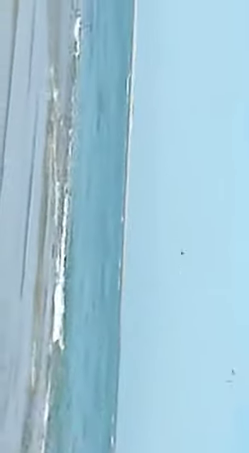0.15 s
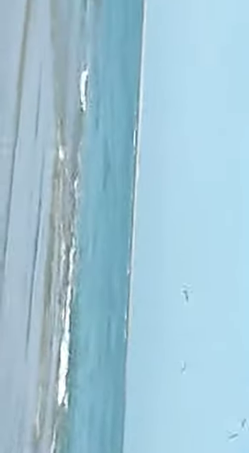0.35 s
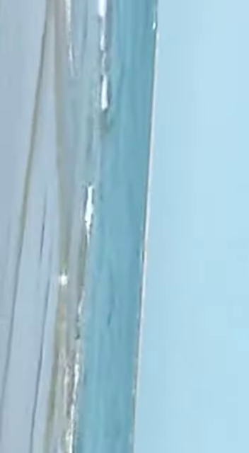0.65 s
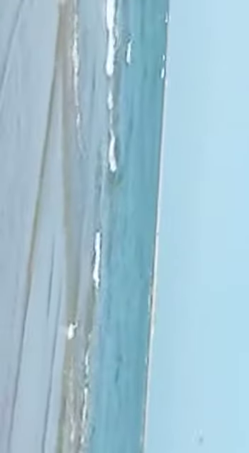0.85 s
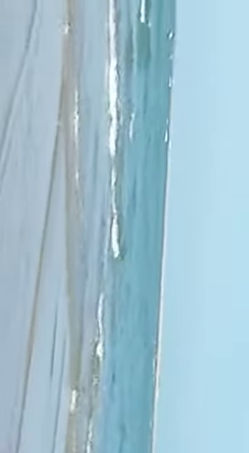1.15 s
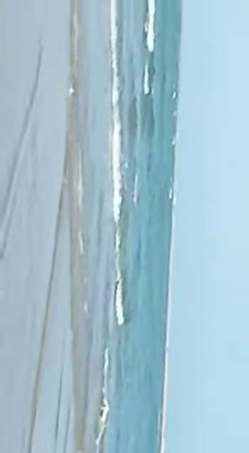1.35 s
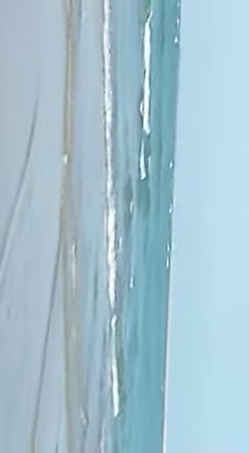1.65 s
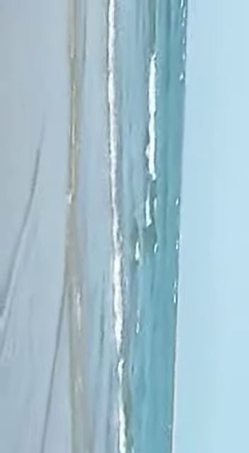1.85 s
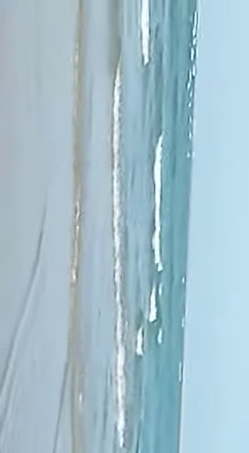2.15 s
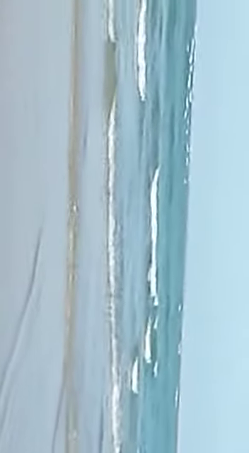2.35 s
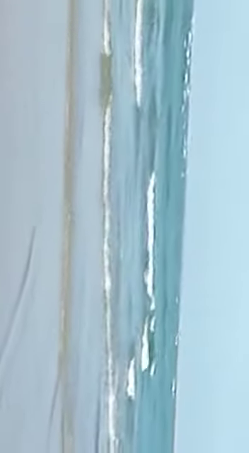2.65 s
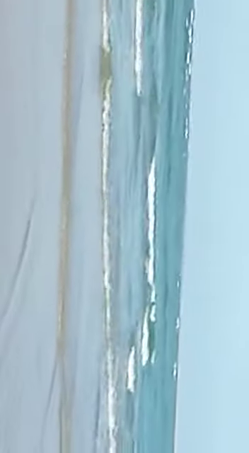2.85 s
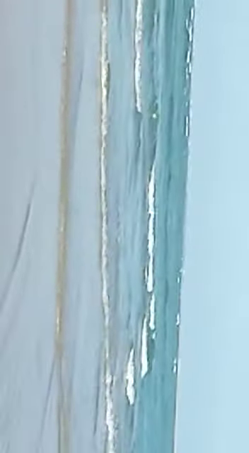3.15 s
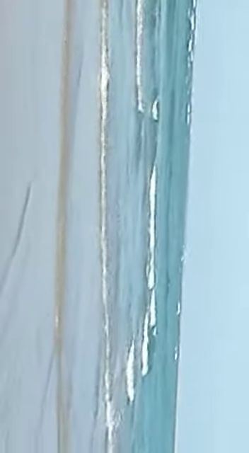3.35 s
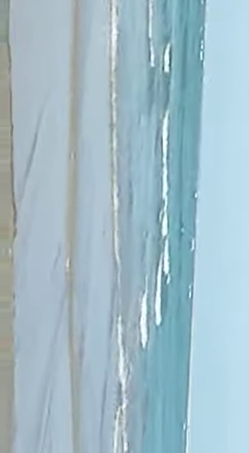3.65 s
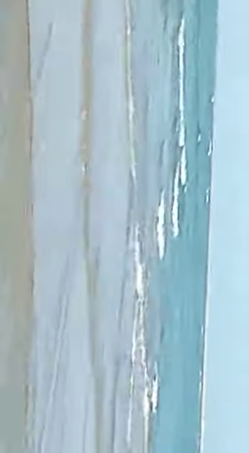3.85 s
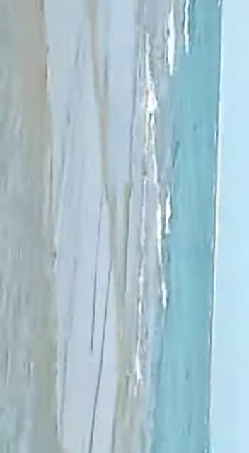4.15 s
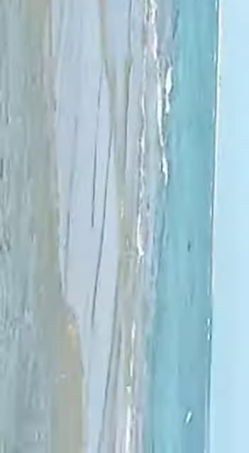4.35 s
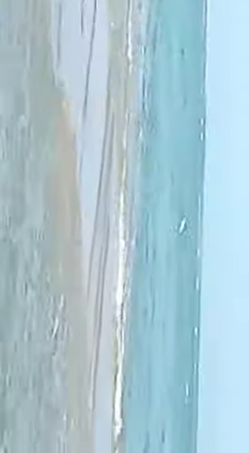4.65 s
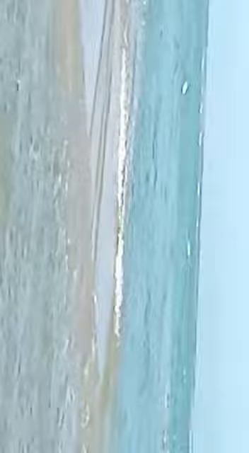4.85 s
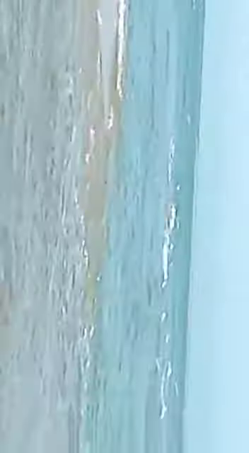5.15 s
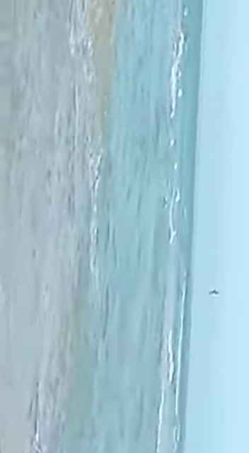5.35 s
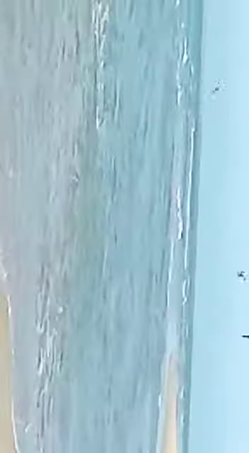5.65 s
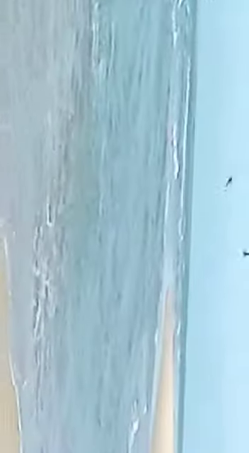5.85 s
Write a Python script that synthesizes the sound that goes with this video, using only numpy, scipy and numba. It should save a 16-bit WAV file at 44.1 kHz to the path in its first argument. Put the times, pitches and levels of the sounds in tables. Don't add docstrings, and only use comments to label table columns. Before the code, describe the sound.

A big flock of terns screams in harsh overlapping trills over a windy beach, heavy gusts thumping the phone microphone above faint surf hiss.

```python
import sys
import numpy as np
from scipy import signal
from scipy.fft import rfft, irfft
from scipy.io import wavfile
from scipy.ndimage import uniform_filter1d, map_coordinates
from numba import njit

SR = 44100
rng = np.random.default_rng(int(sys.argv[2]) if len(sys.argv) > 2 else 0)


def master(y):
    cut = np.clip(np.atleast_2d(y).T, -1, 1)
    pcm = np.round(cut * 32767)
    wavfile.write(sys.argv[1], SR, pcm.astype(np.int16))


def volts_from_decibels(level):
    exponent = np.asarray(level, float) / 20
    return 10 ** exponent


N = 265041
T = np.arange(N) / SR

# (time [s], level [dB], brightness [dB])
FLOCK_LEVELS = [(0.0, -19.5, -27.5), (0.099, -25.5, -28), (0.4, -19.5, -26), (0.65, -16.5, -29.5),
                (1.17, -19.5, -32.5), (1.29, -23, -30.5), (1.841, -23, -31), (1.918, -34.5, -28.5),
                (2.39, -30.5, -28), (2.88, -26.5, -30), (3.06, -38, -29.5), (3.75, -27, -31),
                (4.05, -34.5, -31.5), (4.27, -29.5, -26), (4.7, -20.5, -31), (4.95, -25, -31.5),
                (5.3, -24, -36.5), (6.01, -23.5, -38)]
OVERTONES_DB = [-15.5, -7.5, -2, -3.5, -5, -8, -11.5, -11, -17.5, -11, -13, -7.5, -13.5]
# (time [s], level [dB])
SURF_LEVELS = [(0, -27.5), (1.1, -21.5), (1.3, -25), (1.84, -23.5), (1.92, -30.5), (2.4, -27.5),
               (3.06, -33), (3.75, -30.5), (4.27, -32), (4.45, -28), (4.7, -30.5), (5.1, -29),
               (6.01, -28.5)]
# (frequency [Hz], level per Hz [dB])
SURF_TONE = [(400, -3), (800, -2.5), (1300, -3.5), (1900, 4), (3000, 5), (4500, -6), (6000, -5.5),
             (15500, -14.5)]
# (time [s], level [dB], turbulence [dB])
GUSTS = [(0.0, -19.5, -15.5), (0.38, -25.5, -11.5), (0.55, -17.5, -21.5), (1.07, -15.5, -8.5),
         (1.59, -10, -13), (1.67, -19.5, -9), (1.75, -11, -13), (2.96, -12, -13.5), (3.11, -18.5, -8.5),
         (3.17, -14.5, -10.5), (3.74, -14.5, -11.5), (3.85, -23, -11.5), (4.35, -22, -17),
         (4.44, -12, -10.5), (4.67, -19.5, -12), (5.2, -15, -7), (5.37, -19.5, -10), (6.01, -19.5, -9.5)]
# (frequency [Hz], level per Hz [dB])
WIND_TONE = [(15, -66.5), (25, -38.5), (74, -4), (111, 0), (143, -1), (300, -6), (501, -15), (743, -25),
             (961, -32), (1500, -39), (1950, -52), (3300, -120)]
# (time [s], length [s], level [dB])
HISSES = [(1.115, .015, -18), (1.151, .015, -14.5), (1.192, .05, -12), (1.258, .052, -17), (1.32, .02, -22),
          (0.351, .05, -16), (.57, .05, -15), (1.488, .05, -19.5), (1.81, .05, -18), (2.84, .085, -22.5),
          (3.41, .04, -24), (4.26, .08, -21), (4.66, .04, -18), (.79, .04, -16.5), (1.03, .06, -16.5),
          (.15, .025, -19), (2.44, .075, -25.5), (2.76, .05, -27), (4.5, .04, -21), (4.76, .085, -19.5),
          (5.875, 0, -25), (3.2, .04, -28), (5.48, .025, -27)]
# (time [s], peak [dB], centre [Hz], edge [dB])
THUMPS = [(0.204, -4.5, 194, -29), (0.623, -7, 135.4, -10), (1.003, -6, 200, -29), (1.171, -2, 346, -26),
          (1.299, -1, 201, -18), (1.327, -4, 243, -30), (1.626, -6.5, 279, -17), (1.883, -1.5, 205, -24),
          (1.921, -10, 312, -29), (1.95, -3, 132, -26), (3.158, 0.5, 170, -23), (2.11, 4.5, 130.4, -18),
          (2.749, -5, 148.5, -6), (2.8, 1, 125, -13), (2.937, 0, 285, -36), (3.435, 0, 175, -20),
          (3.613, -9, 157, -27), (3.753, -3, 136.7, -10.5), (3.885, -11, 224, -21), (4.396, -7.5, 276, -20),
          (2.28, -2, 213, -17), (4.803, -0.5, 249, -20), (4.893, -3, 225, -23), (5.064, -2.5, 317, -24),
          (5.206, -5, 138, -14), (5.493, -3.5, 124.3, -9.5), (3.712, -4, 125, -20), (5.704, -3, 169, -10.5),
          (5.89, -6.5, 257, -18), (5.972, -5, 153.6, -13), (.384, -25, 139, -22), (.418, -11, 99, -11),
          (0.879, -20, 115, -16), (1.093, 0.5, 210, -28), (1.387, -3.5, 144, -23), (1.732, -8, 153, -19),
          (3.376, -8, 165.5, -13.5), (3.558, -2.5, 211, -27), (3.986, -8.5, 170, -31),
          (4.045, -14, 216, -16), (4.322, -11, 132, -7.5), (4.422, -15, 131, -7), (4.483, -7.5, 194, -11),
          (4.52, -2, 169, -13), (5.553, -7, 128, -20), (5.255, -7, 187.5, -6), (5.838, -6.5, 191, -21),
          (5.603, -8, 200, -12), (5.935, -4.5, 150, -12), (4.712, -5.5, 186, -18), (5.997, -0.5, 165, -13),
          (1.699, -15, 147, -23), (2.2, -0.5, 200, -19)]
# (middle [s], pitch [Hz], slide over the cry [fraction], level [dB], second overtone [dB])
SCREAMS = [(.255, 1162, -0.0041, -26.5, 1), (.395, 1052, 0, -27.5, 1), (.443, 1145, -.05, -27.5, 5),
           (.571, 1230, .11, -26.5, -10), (.674, 1084, .1, -29.5, -1), (.722, 1132, 0.054, -34, 11),
           (.798, 1073, -0.089, -34, 16), (0.811, 1334, -.1, -24.5, -1), (.902, 1198, 0.0064, -26, 7),
           (1.078, 1023, 0.00036, -28.5, 1), (1.141, 1173, .1, -26, 3), (1.495, 1050, 0.099, -29, -10),
           (1.525, 1112, .1, -30, 5), (1.572, 1155, -0.086, -31.5, 7.5), (1.644, 1108, -0.0041, -29.5, 6),
           (1.8, 1085, -.05, -37.5, -3), (2.23, 1040, .07, -45, 6), (2.36, 1180, .03, -37, -2),
           (2.44, 1110, 0.131, -37, 7), (2.51, 1146, -.1, -39, 16), (2.666, 1250, 0.034, -37, 2),
           (2.92, 1215, -.12, -40.5, -8), (2.88, 1105, -0.08, -38, 13), (3.217, 1144, -0.092, -46, 9),
           (3.704, 1163, -0.059, -47.5, 8), (3.755, 1107, -0.12, -35.5, 2),
           (4.096, 1020, -.05, -40.5, 15.5), (4.171, 1233, -.06, -49.5, 17), (4.39, 900, 0.097, -52, 18),
           (4.435, 1090, 0.09, -30.5, -4), (4.466, 1105, -.05, -33.5, 7), (4.514, 1039, -.1, -30, 2),
           (4.657, 1115, -.05, -31, 3), (4.897, 1120, -.1, -30, -6), (4.981, 1090, -.1, -34, 9),
           (5.464, 1107, .05, -31, 0), (5.59, 1148, -.03, -32, -6), (5.659, 1120, -0.00067, -31, 2),
           (5.83, 1030, .05, -44, 12), (5.89, 1135, -0.0014, -34, -8)]
# (time [s], length [s], pitch [Hz], level [dB], brightness [dB])
RATTLES = [(0.281, 0, 1168, -20.5, -42), (0.491, 0.0023, 1225, -30.5, -34),
           (0.643, 0.0006, 1025, -25.5, -34), (0.74, .1, 1144, -24, -36.5),
           (1.037, 0.079, 1114, -23.5, -41.5), (1.19, 0.033, 1125, -23, -31.5),
           (2.079, 0.0029, 1153, -23, -34), (2.626, 0, 989, -30, -33.5), (3.018, 0, 1264, -23.5, -29),
           (3.048, .092, 1246, -31, -26.5), (3.187, 0.11, 1145, -30.5, -29.5),
           (3.615, .03, 1168, -24, -36.5), (4.077, 0.0086, 1172, -21, -44), (4.192, 0, 1204, -21, -39.5),
           (4.341, .021, 1161, -22.5, -38.5), (4.394, 0.002, 1132, -20.5, -34),
           (4.631, 0.011, 1048, -23, -33), (4.724, 0.007, 1087, -32, -28), (4.871, 0.0072, 1174, -19, -34),
           (4.92, 0.1, 1338, -31.5, -24), (5.042, 0, 1187, -24, -36.5), (5.11, 0, 1160, -19.5, -43),
           (5.211, 0.022, 1165, -19.5, -43), (5.454, .028, 1107, -20.5, -45.5)]
# (time [s], length [s], pitch [Hz], level [dB], brightness [dB])
TRILLS = [(0.32, 0.049, 1140, -19, -37), (0.565, 0.036, 1234, -16, -31), (1.129, 0.025, 1156, -24.5, -36),
          (1.5, 0.09, 1184, -23, -33), (1.669, 0.058, 1162, -20.5, -36.5), (1.807, 0.059, 1146, -32, -26.5),
          (2.352, .017, 1174, -25.5, -29.5), (2.43, .12, 1171, -32.5, -28.5),
          (2.3, .045, 1173, -30.5, -35.5), (2.76, 0.13, 1143, -31, -27.5), (3.463, 0.042, 1175, -29.5, -28),
          (3.746, 0.11, 1134, -33, -33), (4.434, 0.0094, 1096, -28.5, -43),
          (4.558, 0.034, 1113, -24, -31.5), (4.658, 0.031, 1092, -25.5, -30),
          (5.245, 0.016, 1173, -19, -46), (5.382, 0.024, 1220, -23, -37),
          (5.556, 0.043, 1128, -23.5, -42.5), (5.891, 0.044, 1138, -28, -39.5)]
# (time [s], length [s], pitch [Hz], level [dB], brightness [dB])
ANSWERS = [(1.2, 0.027, 1248, -30.5, -29), (2.62, .06, 1030, -33, -38), (1.8, 0.054, 1230, -33, -36),
           (3.2, 0.041, 1060, -32, -33), (3.018, .065, 1055, -31.5, -36), (3.17, 0.034, 1116, -35, -38),
           (3.905, .045, 1095, -35.5, -38), (4.205, .02, 1187, -31.5, -38), (.58, 0.047, 1300, -19.5, -37),
           (.81, 0.037, 1345, -26, -36), (4.69, .02, 1500, -23, -36), (5.17, 0.045, 1000, -25.5, -40),
           (1.99, .06, 1170, -29, -41), (2.16, 0.078, 700, -36, -38), (4, .04, 1030, -33, -38),
           (2.9, 0.055, 1130, -32, -38), (5.3, 0.016, 1000, -24, -44), (5.405, 0.02, 1400, -25.5, -42),
           (5.965, 0.021, 1120, -24, -42), (1.7, 0.024, 1195, -28, -35), (0.84, .07, 1010, -24, -36),
           (2.53, .04, 1225, -32, -38), (3.5, .04, 1030, -33, -38), (5.79, 0.034, 1400, -35, -42)]
# (time [s], length [s], pitch [Hz], level [dB], brightness [dB])
CHURRS = [
    (3.953, 0, 1046, -32.5, -38),
    (4.0, 0.041, 1066, -32, -41),
    (4.066, 0.02, 1047, -35.5, -42),
    (4.105, 0.02, 1277, -27.5, -34),
    (4.145, 0.04, 1257, -28, -37),
    (4.3, 0.011, 1204, -37.5, -38),
    (4.845, .1, 1130, -41, -36),
    (2.19, .07, 1052, -34, -37),
]
# (time [s], peak [dB])
SLAPS = [(4.398, -12), (4.456, -14), (4.541, -10.5), (4.616, -15), (4.762, -16), (4.805, -14),
         (4.905, -13.5), (5.031, -13), (5.066, -15), (5.102, -12), (5.175, -8), (5.214, -9), (5.346, -22),
         (5.443, -18), (5.493, -11), (5.565, -17), (5.673, -16.5), (5.897, -19), (5.949, -17), (5.972, -9),
         (1.24, -19), (1.505, -24), (1.577, -17), (1.752, -26), (1.998, -19), (2.03, -20), (2.069, -16),
         (2.2, -20), (2.362, -16), (2.385, -13), (2.56, -32), (2.865, -27), (2.996, -17), (3.243, -23),
         (3.582, -22), (4.495, -21), (4.787, -31), (5.014, -15), (5.583, -17), (5.755, -17)]
# (frequency [Hz],
# level [dB])
MICROPHONE_TONE = [(2400, -0.5), (2650, -4.5), (2900, 3), (4300, 0.5), (4700, -11.5), (5100, -19.5),
                   (5600, -30), (6100, -25.5), (7300, -27.5), (8500, -34), (10000, -38), (11500, -37),
                   (13000, -49.5), (15500, -57.5)]


def level(x):
    return x / np.sqrt(np.mean(x ** 2))


def gain_at(table, hz):
    f, db = np.transpose(table)
    return np.interp(np.log(hz), np.log(f), db)


def colour(x, table, size=8192):
    hz = np.maximum(np.arange(size // 2 + 1) * SR / size, 1)
    cepstrum = irfft(np.log(volts_from_decibels(gain_at(table, hz))))
    cepstrum[1:size // 2] *= 2
    cepstrum[size // 2 + 1:] = 0
    ringing = irfft(np.exp(rfft(cepstrum)))
    return signal.fftconvolve(x, ringing)[:len(x)]


def split(x, hz):
    low = signal.sosfiltfilt(signal.butter(5, hz, fs=SR, output="sos"), x)
    return low, x - low


def smooth_twice(x, k):
    return uniform_filter1d(uniform_filter1d(x, k), k)


def walk(rate):
    k = int(SR / rate)
    steps = np.repeat(rng.standard_normal(N // k + 1), k)
    return level(smooth_twice(steps, k)[:N])


def steady(x, seconds):
    return x / np.sqrt(smooth_twice(x ** 2, int(seconds * SR)) + 1e-12)


def follow(table):
    s, *columns = np.transpose(table)
    return [np.interp(T, s, c) for c in columns]


def samples(s):
    return (s * SR).astype(np.int64)


@njit
def bursts(start, length, hz, glide, gains, turns):
    out = np.zeros(N)
    for e in range(len(start)):
        phase = 0.
        for i in range(length[e]):
            u = i / length[e]
            phase += 2 * np.pi * hz[e] * (1 + glide[e] * (u - .5)) / SR
            j = start[e] + i
            if j >= 0 and j < N:
                total = 0.
                for k in range(gains.shape[1]):
                    total += gains[e, k] * np.sin((k + 1) * phase + turns[e, k])
                out[j] += total * np.sin(np.pi * u) ** 2
    return out


def pips(s, hz, db, second_db, top_db, seconds, scatter_db, slide=0.024):
    count = len(OVERTONES_DB)
    order = np.arange(1, count + 1)
    chance = rng.standard_normal((len(s), 2 * count + 2))
    throat_db = OVERTONES_DB + np.outer(second_db, order == 2) + np.outer(top_db, order > 4)
    gains = volts_from_decibels(db[:, None] + throat_db + scatter_db * chance[:, :count])
    length = samples(seconds * np.exp(.15 * chance[:, -1]))
    glide = slide + .015 * chance[:, -2]
    return bursts(samples(s) - length // 2, length, 1. * hz, glide, gains, 10 * chance[:, count:-2])


def flock(pitch_hz=1195, count=400, size=16):
    bird = rng.standard_normal((count, 5, 1))
    onset = (np.arange(count) + 8 * rng.random(count)) * 6.5 / count - .45
    slip = rng.standard_normal((count, size, 3))
    along = np.linspace(-1, 1, size)
    gaps_s = .017 * np.exp(.3 * bird[:, 0] - .2 * along + .25 * slip[..., 0])
    s = onset[:, None] + np.cumsum(gaps_s, axis=1)
    hz = pitch_hz * np.exp(.06 * bird[:, 1] - .075 * (along + .3) ** 2 + .013 * slip[..., 1])
    db = 2.2 * bird[:, 2] + 2.5 * slip[..., 2] - 8 * along ** 4
    second_db = 1.5 * bird[:, 3] + 0 * s
    top_db = 1.5 * bird[:, 4] + 0 * s
    columns = (s, hz, db, second_db, top_db)
    return pips(*(c.ravel() for c in columns), seconds=0.014, scatter_db=0.5)


def surf():
    return level(colour(rng.standard_normal(N) * volts_from_decibels(2.0 * walk(20)), SURF_TONE))


def wind():
    happens = rng.random(N) < 900 / SR
    kicks = rng.standard_normal(N) * happens * volts_from_decibels(2.5 * np.minimum(rng.exponential(size=N), 3))
    flurries = volts_from_decibels(2.9 * walk(30) + 2.9 * walk(16))
    pressure = (level(kicks) + 0.75 * rng.standard_normal(N)) * flurries
    rumble, rasp = split(colour(pressure, WIND_TONE), hz=363.0)
    gust_db, rasp_db = follow(GUSTS)
    return volts_from_decibels(gust_db) * (steady(rumble, seconds=0.067) + volts_from_decibels(rasp_db) * steady(rasp, seconds=0.072))


def hisses(size=8, gap_s=.0125, puff_s=.008):
    s, seconds, db = np.transpose(HISSES)[..., None]
    gaps = np.round(seconds / gap_s)
    times = s + seconds * np.arange(size) / np.maximum(gaps, 1)
    sizes = volts_from_decibels(db + 1.5 * rng.standard_normal(times.shape)) * (np.arange(size) <= gaps)
    beats = np.bincount(samples(times).ravel(), sizes.ravel(), N)[:N]
    gate = signal.fftconvolve(beats, np.hanning(int(puff_s * SR)), "same")
    _, bright_air = split(rng.standard_normal(N), hz=5300)
    return gate * bright_air


def thumps(cycles=2.91):
    s, db, hz, edge_db = np.transpose(THUMPS)
    shape_db = [1.5, -7.0, 2.0, -7.0, -8.0]
    gains = volts_from_decibels(db[:, None] - 4.0 + shape_db + np.outer(edge_db, [0, 0, 1, 1, 1]))
    turns = 2 * np.pi * rng.random(gains.shape)
    return bursts(samples(s), samples(cycles / hz), hz, 0 * hz - .3, gains, turns)


def screams():
    s, hz, slide, db, second_db = np.transpose(SCREAMS)
    held = pips(s, hz, db, second_db, 0 * s - 7.0, seconds=0.11, scatter_db=1.5, slide=slide)
    return held * volts_from_decibels(6 * walk(110))


def near_birds(table, gap_s, second_db, sag=0.033, arch=.5, size=10):
    s, seconds, hz, db, top_db = np.array(table, float).T[..., None]
    slip = rng.standard_normal((len(table), size, 3))
    gaps = np.round(seconds / gap_s)
    along = np.arange(size) / np.maximum(gaps, 1)
    silent_db = -200 * (np.arange(size) > gaps)
    sagging = sag * (along - .5) * (gaps > 0)
    arching = arch * seconds * (2 * along - 1) ** 2
    pip_hz = hz * np.exp(-sagging - arching + 0.013 * slip[..., 0])
    pip_db = db + 0.33 * slip[..., 1] + silent_db
    throat_db = second_db - 30 * np.log(hz / 1160) + 2.0 * slip[..., 2]
    columns = (s + seconds * along, pip_hz, pip_db, throat_db, top_db + 34.0 + 0 * along)
    return pips(*(c.ravel() for c in columns), seconds=.014, scatter_db=1.3)


def slaps(hz=420, cycles=1.52):
    s, db = np.transpose(SLAPS)
    chance = rng.random((len(s), 2))
    pitch = hz * (0.81 + 0.32 * chance[:, 0])
    gains = volts_from_decibels(db[:, None] + [5, -5])
    turns = 0 * gains + np.pi * np.round(chance[:, 1:])
    return bursts(samples(s), samples(cycles / pitch), pitch, 0 * s, gains, turns)


def scene():
    flock_db, bright_db = follow(FLOCK_LEVELS)
    surf_db, = follow(SURF_LEVELS)
    far = steady(flock(), seconds=0.052) * volts_from_decibels(flock_db)
    body, top = split(far + surf() * volts_from_decibels(surf_db), hz=5440)
    distance = body + top * volts_from_decibels(bright_db + 34.5)

    near = near_birds(RATTLES, gap_s=.028, second_db=-2.5)
    near = near + near_birds(TRILLS, gap_s=.0145, second_db=1.0)
    near = near + near_birds(ANSWERS, gap_s=0.015, second_db=0.5)
    near = near + near_birds(CHURRS, gap_s=.021, second_db=10.5) + screams()
    near = map_coordinates(near, [(T + .0002 * walk(80)) * SR], mode="mirror")

    buffet = 1.15 * np.tanh((wind() + thumps() + slaps()) / 1.15)
    return (distance + near + hisses() + buffet)[None]


def roll_off(x):
    return signal.sosfilt(signal.butter(12, 15500, fs=SR, output="sos"), x)


def record(dry):
    lead = SR // 4
    running = colour(np.concatenate([dry[0, lead:0:-1], dry[0]]), MICROPHONE_TONE)[lead:]
    fade = np.sin(np.pi / 2 * np.clip((T[-1] - T) / .003, 0, 1))
    heard = running * fade
    return roll_off(heard[None])


dry = scene()
out = record(dry)
master(out)
```